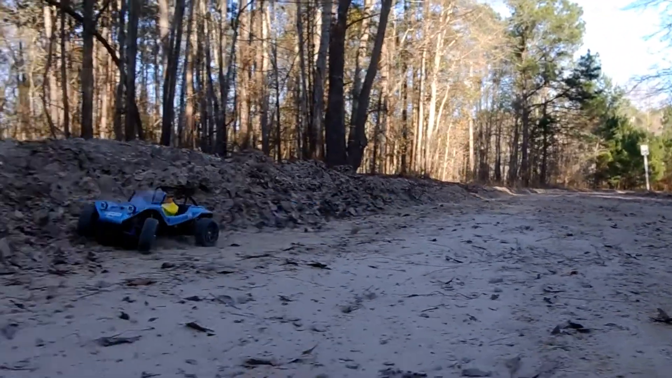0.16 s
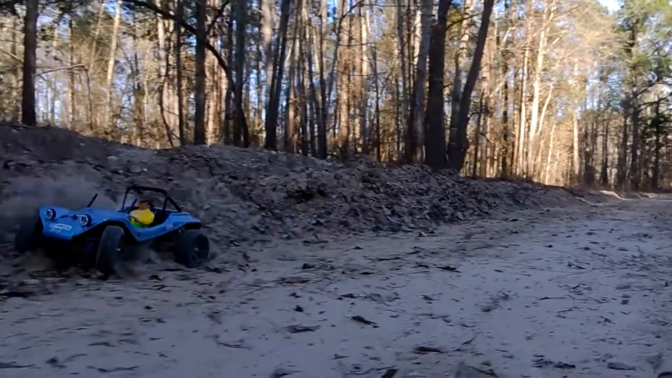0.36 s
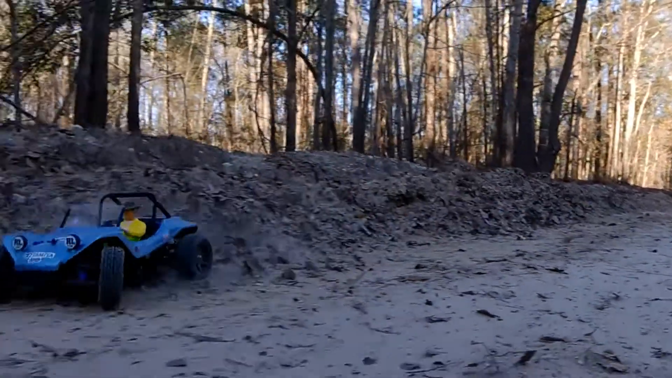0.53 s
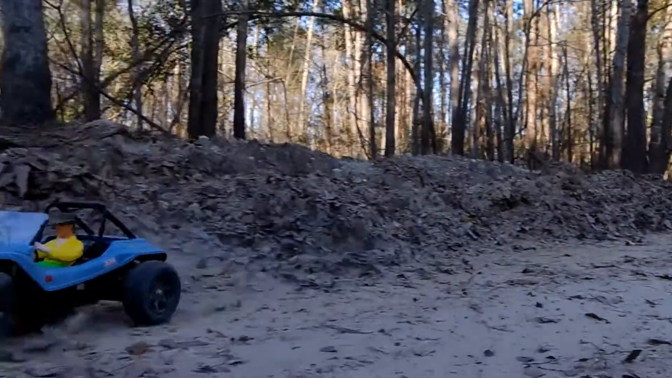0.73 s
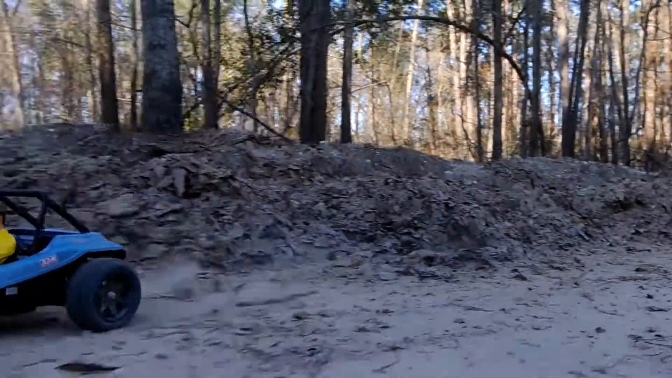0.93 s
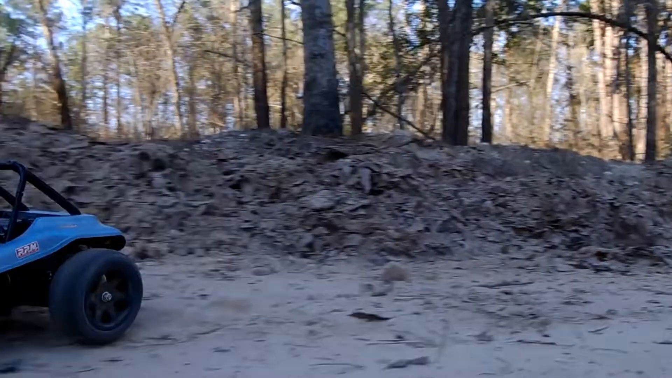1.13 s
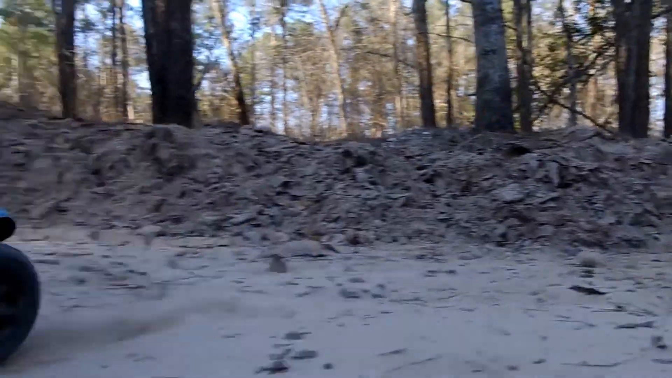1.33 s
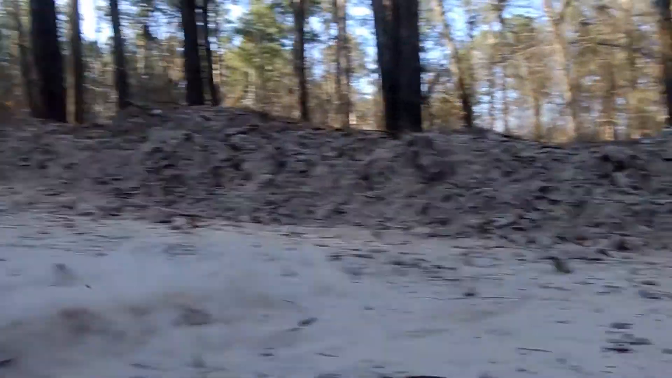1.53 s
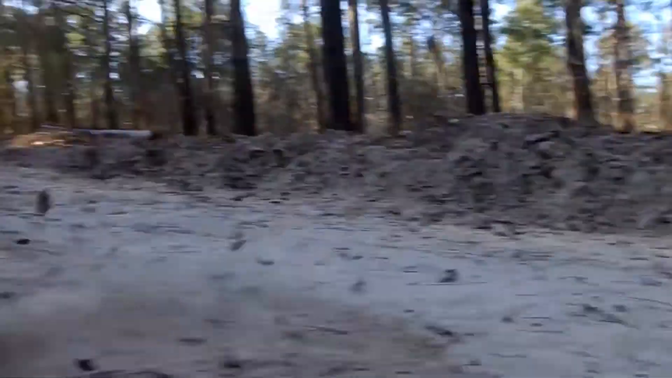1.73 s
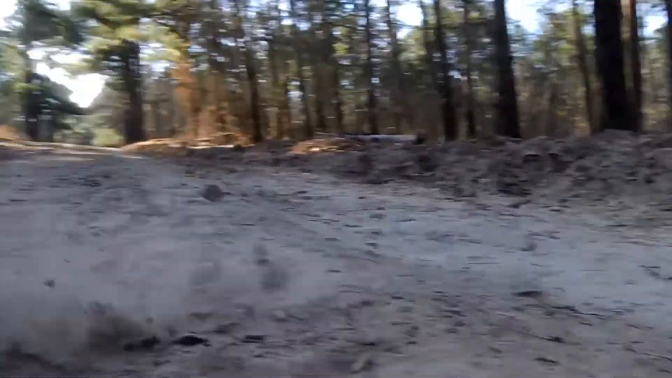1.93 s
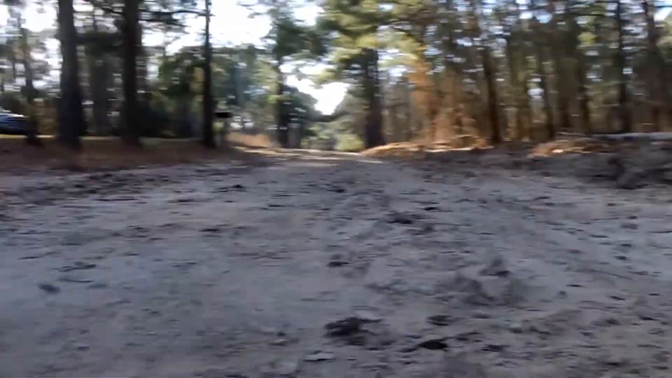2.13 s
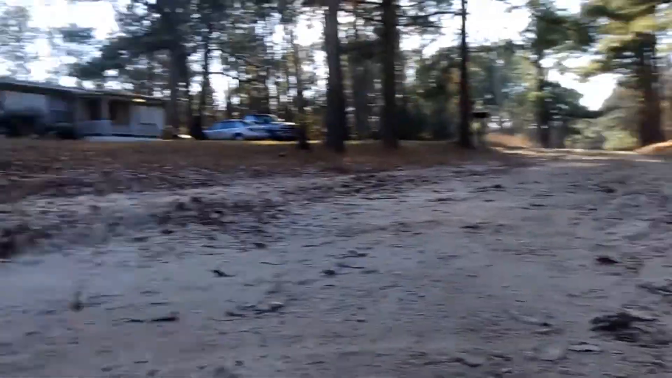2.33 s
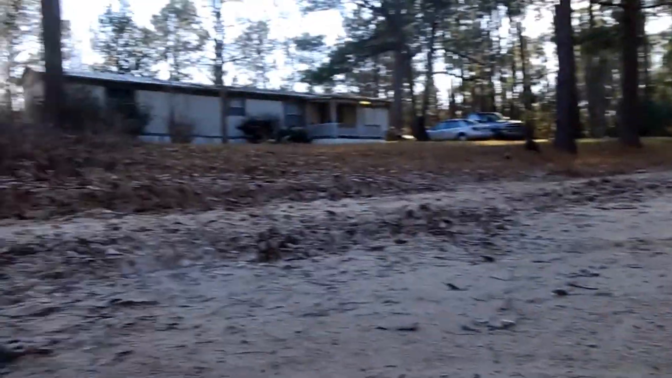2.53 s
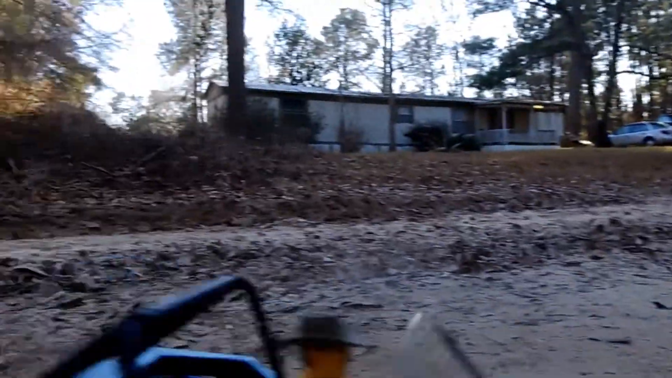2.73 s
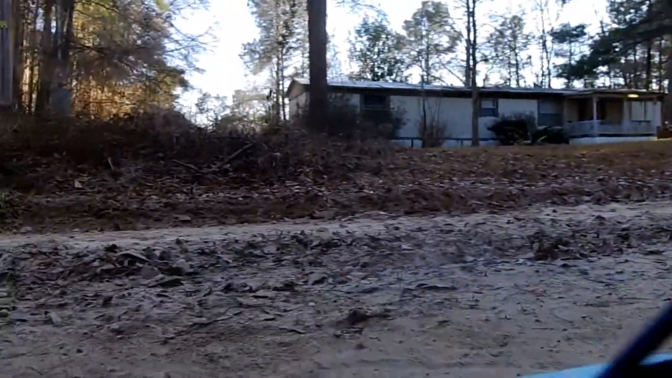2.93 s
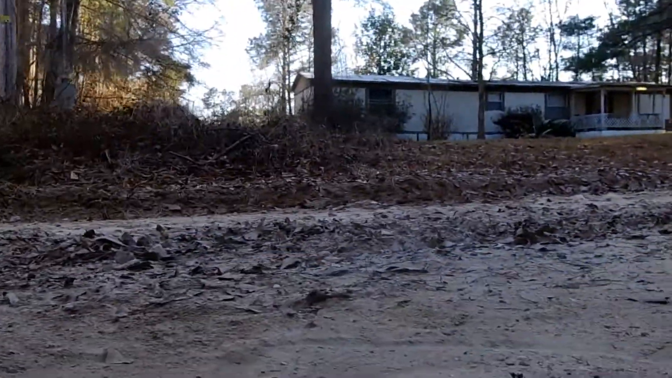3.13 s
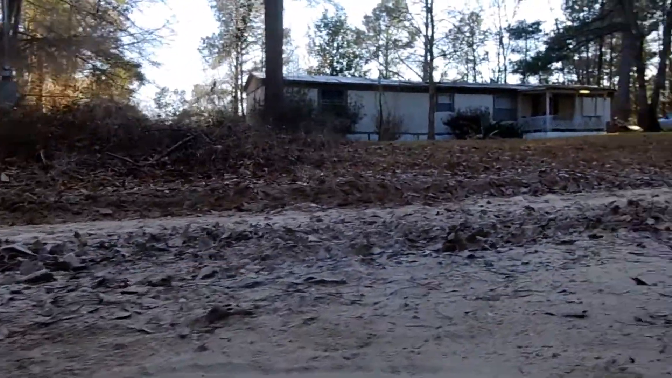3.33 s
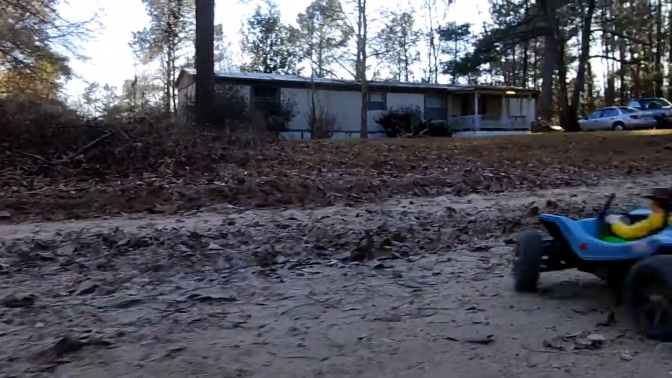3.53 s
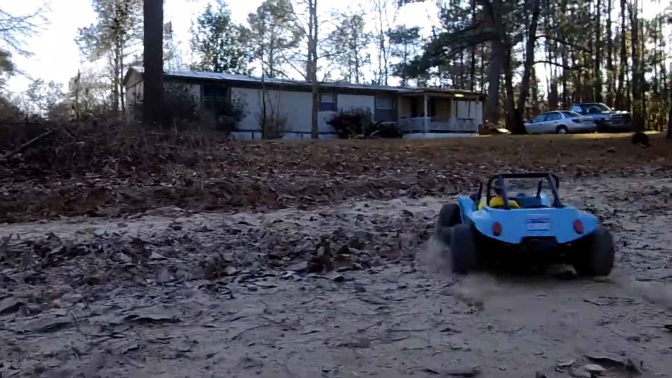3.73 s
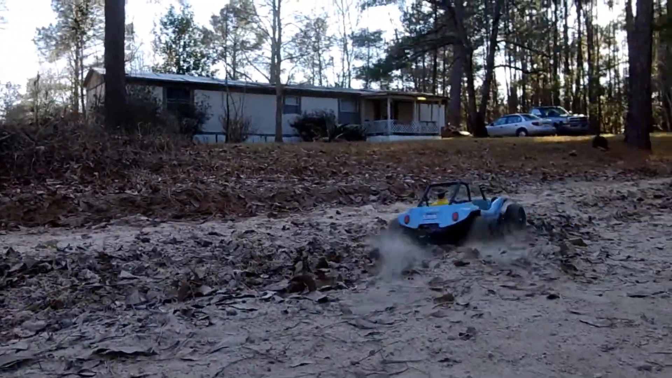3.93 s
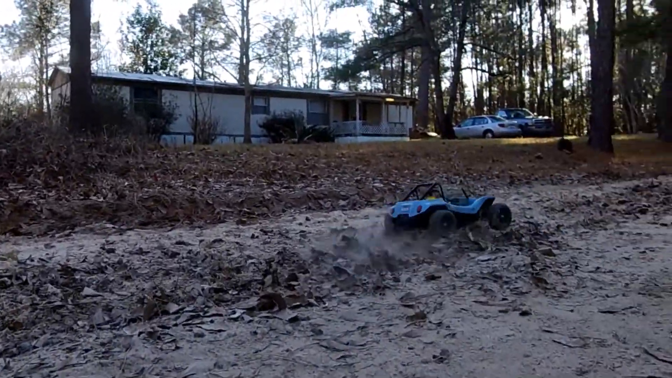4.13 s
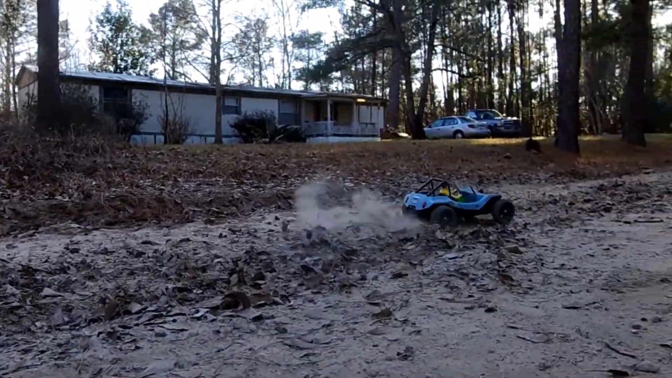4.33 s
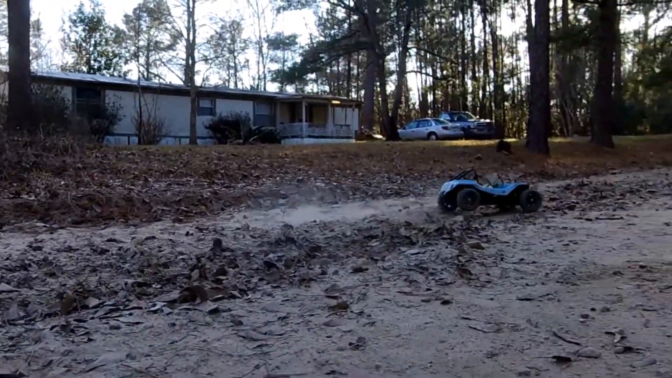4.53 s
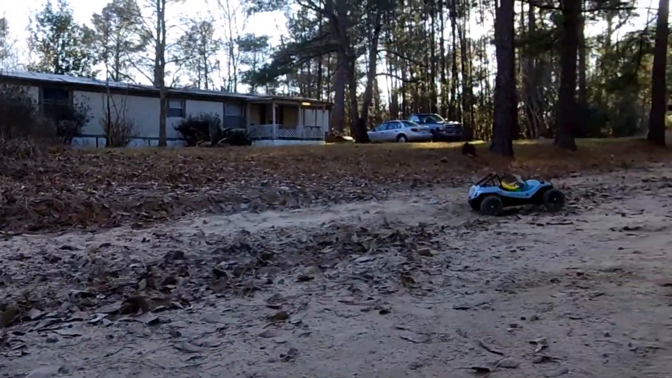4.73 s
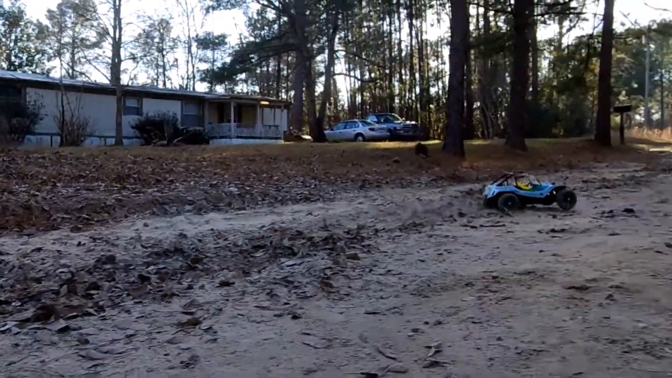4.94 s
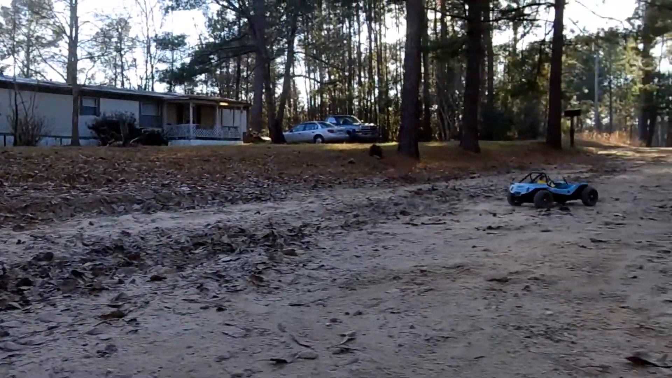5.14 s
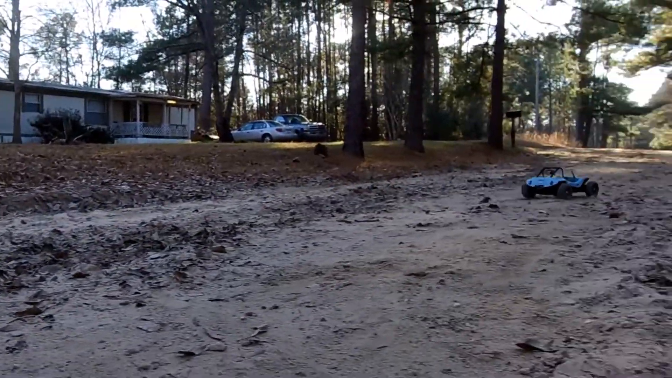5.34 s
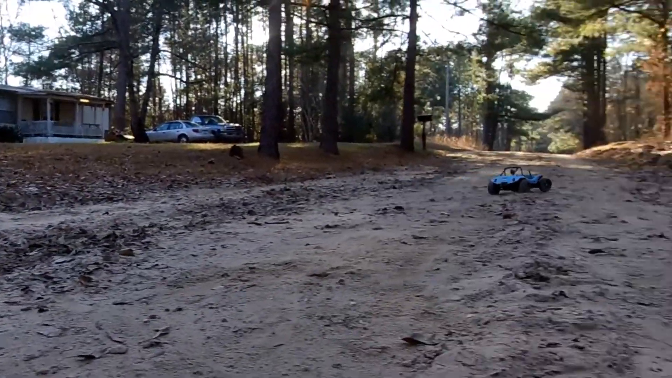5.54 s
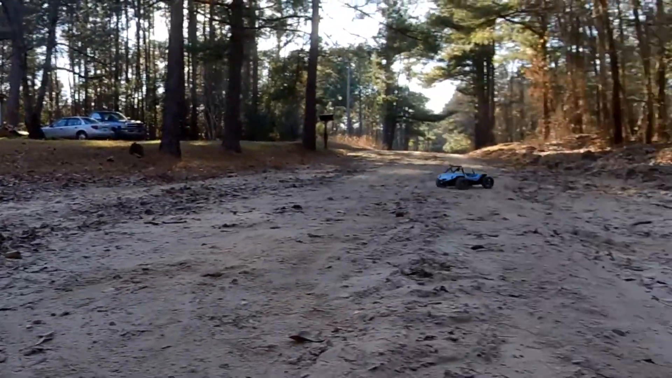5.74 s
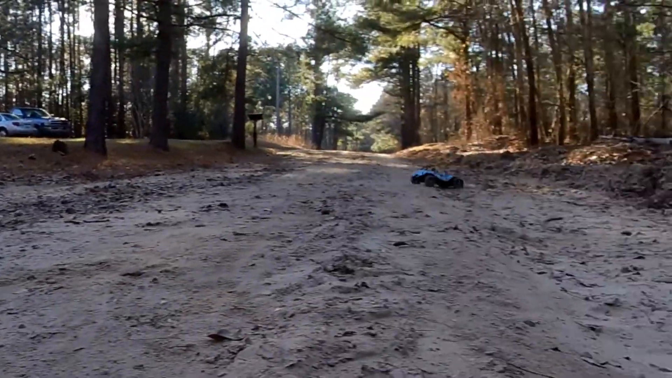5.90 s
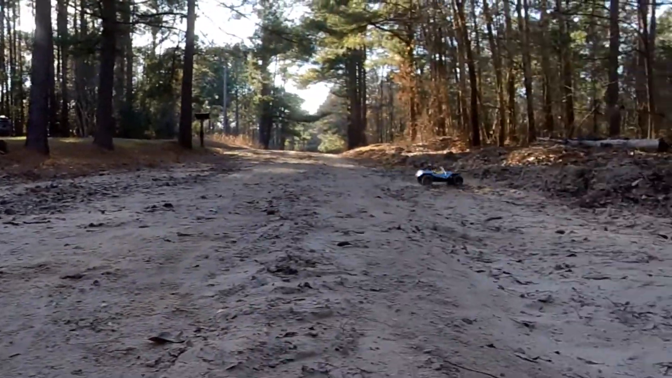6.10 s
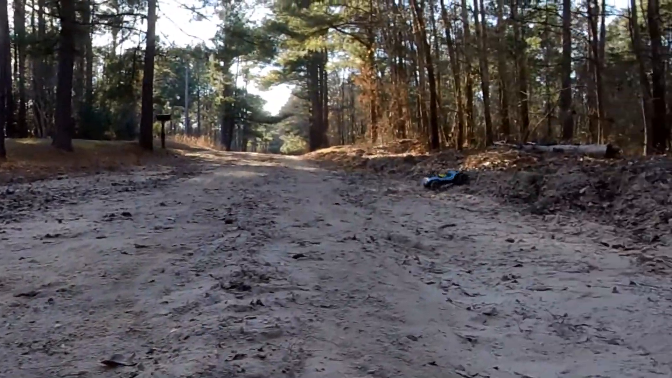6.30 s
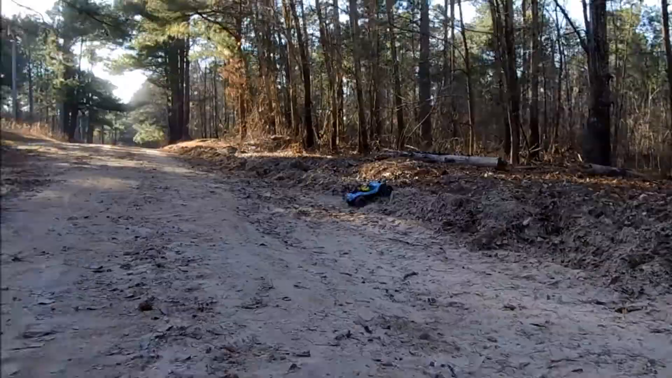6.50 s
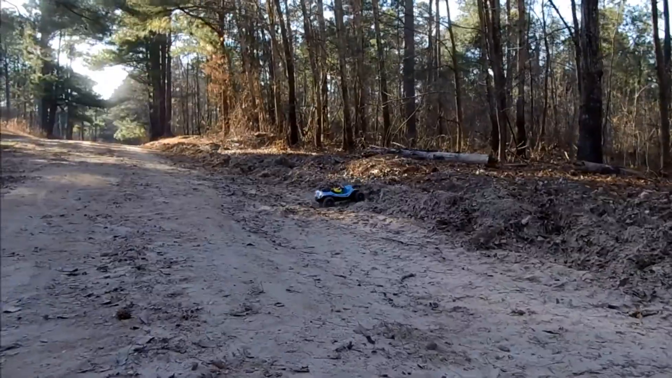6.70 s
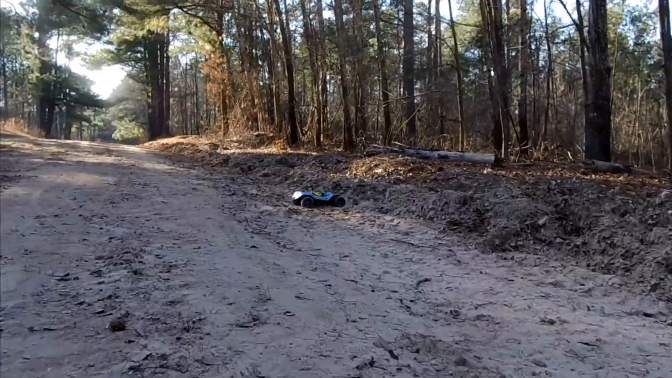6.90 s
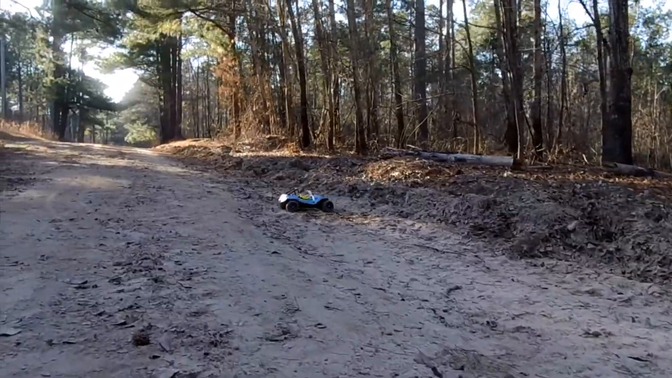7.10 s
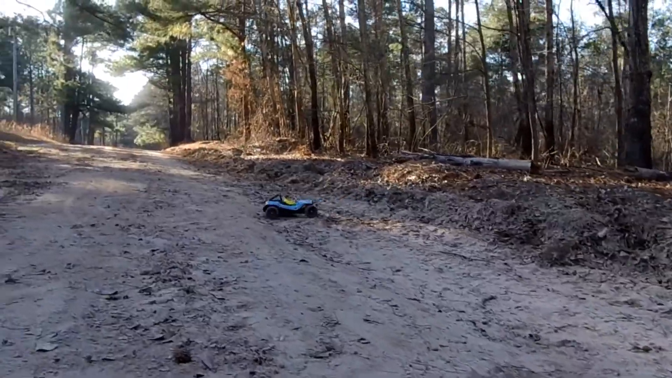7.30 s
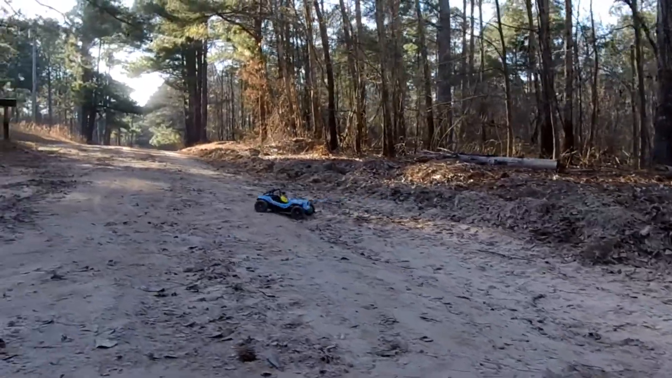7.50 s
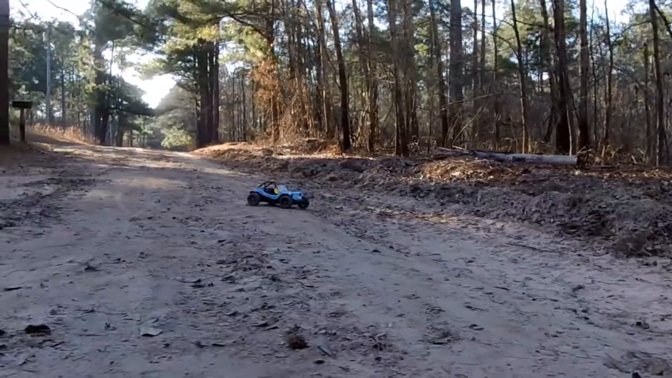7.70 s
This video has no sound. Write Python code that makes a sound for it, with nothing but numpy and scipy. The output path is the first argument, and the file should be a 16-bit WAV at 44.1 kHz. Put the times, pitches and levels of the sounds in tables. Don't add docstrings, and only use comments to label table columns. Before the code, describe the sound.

Outdoors on a dirt road by woods, a small remote-controlled buggy approaches with a wavering electric gear whine. Wind gusts thump and slap the phone microphone early on. The buggy passes very close around two seconds, its plastic body drumming with stone knocks, circles, then races and dips across ruts, spraying sand and leaves. It drives away, thinning to a faint whine and small clicks over a quiet hush.

```python
import sys
import numpy as np
from scipy import signal
from scipy.fft import rfft, irfft, next_fast_len
from scipy.io import wavfile
from scipy.ndimage import uniform_filter1d

SR = 44100
rng = np.random.default_rng(int(sys.argv[2]) if len(sys.argv) > 2 else 0)


def volts(x):
    e = np.asarray(x, float) / 20
    return 10 ** e


def inscribe(sig):
    pcm = np.round(np.clip(np.atleast_2d(sig).T, -1, 1) * 32767)
    wavfile.write(sys.argv[1], SR, pcm.astype(np.int16))


N = 342171
T = np.arange(N) / SR

# mode_hz, width_hz, level_db
TUB_MODES = [(413, 211, -2), (700, 340, -1), (1006, 620, -3), (1900, 1340, -12.5)]


def unit(x):
    return x / np.sqrt(np.mean(x ** 2))


def along(points, hz):
    f, db = np.transpose(points)
    return np.interp(np.log(hz), np.log(f), db)


def colour(x, points):
    size = next_fast_len(N)
    hz = np.arange(size // 2 + 1) * SR / size + 1
    return irfft(rfft(x, size) * volts(along(points, hz)), size)[:N]


def ring(x, modes):
    out = 0
    for k, (hz, wide, db) in enumerate(modes):
        b, a = signal.iirpeak(hz, hz / wide, SR)
        out = out + (-1) ** k * volts(db) * signal.lfilter(b, a, x)
    return out


def band(x, lo_hz, hi_hz):
    sos = signal.butter(4, (lo_hz, hi_hz), "bandpass", fs=SR, output="sos")
    return x / np.std(signal.sosfilt(sos, x))


def walk(rate):
    k = int(SR / rate)
    held = np.repeat(rng.standard_normal(N // k + 1), k)
    return unit(uniform_filter1d(uniform_filter1d(held, k), k)[:N])


def grains(rate, spread_db):
    hit = rng.random(N) < rate / SR
    sign, size = rng.standard_normal(N), rng.exponential(size=N)
    return unit(hit * sign * volts(spread_db * np.minimum(size, 4)))


def lulls():
    # from_s, to_s, effort_db
    lull_list = [(0, .07, -15), (.21, .345, -9), (.37, .41, -10), (.46, .5, -10), (.815, .848, -15),
                 (1.392, 1.409, -10), (1.426, 1.442, -12), (1.594, 1.604, -8), (1.655, 1.692, -14),
                 (3.018, 3.032, -12), (3.176, 3.194, -12), (3.595, 3.608, -10), (4.908, 4.924, -12),
                 (4.555, 4.59, -12), (4.606, 4.643, -15), (4.946, 4.958, -12), (5.03, 5.055, -8),
                 (5.645, 5.765, -6), (6.09, 6.8, -16), (6.8, 7.22, -11), (7.31, 7.37, -2), (7.57, 7.8, -20)]
    effort_db = sum(db * ((T > a) & (T < b)) for a, b, db in lull_list)
    return uniform_filter1d(effort_db, int(0.006 * SR))


def ruts():
    # centre_s, shake_db (tub and gears), extra_spray_db, width_ms
    rut_list = [(.025, 2, 11, 7.9), (.275, 2.5, 4.5, 17), (.3, -9, 6, 5.5), (.39, 4, 6, 17),
                (.825, 2.5, 0, 44), (0.461, 7, 2.5, 22), (.62, 7.5, -0.5, 20.4), (0.709, 0, -1, 3.9),
                (.95, -4, -5, 26), (1.21, 4.5, -19, 51), (1.27, -6, 11, 27.5), (1.63, 0.5, 7, 60),
                (1.711, 4.5, 3, 26.6), (3.0, 4.5, 7, 21), (3.07, 2.5, -17, 18), (3.111, 2.5, 9, 15.8),
                (3.312, 0.5, 8, 18.6), (4.581, -8, -4, 20.5), (4.651, 0.5, -4, 27.5),
                (4.73, -6.5, -3, 18.7), (5.0, 0.5, 0, 59), (5.251, 0.5, -11, 55), (5.97, 3, 4, 53),
                (6.091, -4, -6, 65), (6.27, 4.5, 2, 44), (6.36, -8, -10, 25), (6.411, 4, 11.5, 20),
                (6.649, -5.5, 11, 190), (7.301, 4, 9.5, 280), (7.511, 9.5, -12, 20), (7.641, -5, 2, 51),
                (7.76, 7.5, -2, 42)]
    out = np.zeros((2, N))
    for s, shake_db, spray_db, ms in rut_list:
        out += np.array([[shake_db], [spray_db]]) * np.exp(-.5 * ((T - s) / (ms / 1000)) ** 2)
    return out


def pairs(a, b):
    return np.stack([a, b], axis=1).ravel()


def drivetrain():
    # start_s, tooth_rate_before_hz, braking_ms,
    # tooth_rate_after_hz, grip_db
    approach = [(0.073, 2760, 18, 2520, -1), (0.12, 2600, 34, 2480, -6), (0.148, 2560, 21, 2400, 0),
                (0.186, 2650, 25, 2500, -2.5), (0.35, 2500, 11, 2230, -1), (0.43, 2300, 28, 2100, -0.5),
                (0.503, 2650, 14.2, 2500, -10), (0.533, 2780, 13, 2215, 8.5), (0.575, 2750, 15, 2460, 9),
                (0.611, 2600, 13.4, 2240, 8), (0.657, 2700, 15.3, 2398, 6), (0.686, 2400, 24, 1900, 10),
                (0.725, 1930, 7.6, 1878, 2), (0.755, 2180, 7.4, 2137, -14), (0.79, 2420, 20, 2200, 0.5)]
    on_bank = [(0.855, 2907, 82, 1827, 2.5), (0.962, 2130, 10, 1926, 0), (0.987, 2130, 13.7, 1876, 1),
               (1.02, 2040.0, 9.6, 1830.0, -5.5), (1.047, 1998, 20, 1822, -3), (1.09, 2186, 15, 2000, 0.5),
               (1.123, 2200, 16, 1900.0, 2), (1.193, 2360, 51.5, 1668, -4), (1.31, 2350, 30.7, 1850, 1.5),
               (1.377, 2233, 11.6, 2063, -4), (1.412, 2500.0, 8.3, 2220, 1.5), (1.442, 2500, 52.4, 1696, 0),
               (1.546, 2270, 5.9, 2250, -6), (1.558, 2242, 41, 1665, 1.5), (1.608, 2013, 4.2, 1993, -27),
               (1.652, 2370, 10.3, 2254, -4), (1.71, 2200, 24.2, 1850, 0.5), (1.746, 2202, 21, 2103, 1),
               (1.782, 2233, 34, 1804, 3), (1.879, 2162, 43, 1896, 1), (1.956, 2120, 13.2, 1816, -1),
               (2.041, 2170, 26, 1800, 5), (2.129, 2068, 64, 1728, 3), (2.25, 1935, 54, 1480, 2)]
    circling = [(2.351, 1620, 11.3, 1400, -7), (2.398, 1470, 3.5, 1460, -11), (2.435, 1710, 8.2, 1530, -14),
                (2.468, 1530, 4, 1520, -13), (2.49, 1750, 44, 1630, 1), (2.559, 1830, 50, 1510, 2.5),
                (2.681, 1810.0, 14.0, 1660, -2.5), (2.736, 1920.0, 34, 1670, -6.0),
                (2.806, 2030, 40, 1680, 1.5), (2.862, 1872, 4.4, 1847, 1), (2.892, 1920, 45, 1770, 0),
                (2.953, 1937, 37, 1650, -1), (3.014, 1795, 4, 1787, -5), (3.035, 2160.0, 13.1, 1656, 3),
                (3.063, 1780.0, 8.0, 1697, -6), (3.127, 2250, 21, 1660, 4.5), (3.165, 1703, 10.9, 1609, -6),
                (3.201, 2097, 8, 2020, 5), (3.223, 2105, 20.3, 1963, 6), (3.249, 1900, 12.2, 1510, 5.5),
                (3.292, 2160, 8.3, 2053, -4), (3.325, 2340.0, 19.7, 1614, 5), (3.39, 2070, 50, 1572, -0.5),
                (3.504, 2226, 18.4, 1986, 5), (3.545, 1996, 18.2, 1595, 3.5), (3.576, 1980, 14, 1800, 1),
                (3.611, 2200, 47, 1690, 1.5), (3.68, 1910.0, 7.5, 1690.0, 3),
                (3.702, 1850.0, 8.0, 1772, -1), (3.754, 2270.0, 32, 1670.0, 4.5),
                (3.88, 2410.0, 8.6, 2334, 13)]
    rutted = [(3.915, 2630, 32, 1948, 12), (3.947, 1945, 16, 1766, 6.5), (3.98, 2250, 31, 1944, 1),
              (4.022, 1940, 14.6, 1730, 11), (4.05, 1853, 12.4, 1760, 6), (4.112, 2400, 12, 2150, 12),
              (4.14, 2100, 25, 1680, 13), (4.192, 2127, 16, 1776, 10), (4.262, 2280, 9.3, 2196, 8),
              (4.288, 2380, 34, 2194, 7), (4.325, 2047, 18, 1913, 5), (4.345, 2030, 19.5, 1600, 10.5),
              (4.39, 1770, 7.1, 1725, 7), (4.413, 2084, 19, 1900, 0), (4.448, 2100, 21, 1812, 5),
              (4.48, 1824, 13.7, 1538, 7), (4.522, 1876, 8.2, 1804, 6), (4.538, 2130, 19, 1820, 10.5),
              (4.594, 2810, 10, 2500, 8.5), (4.645, 1866, 14.5, 1465, 12), (4.682, 1482, 18, 1391, 1),
              (4.732, 1680, 4.4, 1640, 15.5), (4.744, 2257, 19.3, 2190, -2), (4.772, 2430, 28, 2050, 5.5),
              (4.823, 2823, 20, 2010, 6)]
    leaving = [(4.86, 2166, 12.0, 1956, 8), (4.889, 2032, 9.7, 1756, 9), (4.978, 2300, 34, 1702, 6.5),
               (5.051, 1925, 11.6, 1862, -4), (5.082, 1954, 20.0, 1784, 1), (5.14, 1983, 6.6, 1878, 9),
               (5.163, 2070, 7.3, 1870, 5), (5.192, 1990, 11, 1850, 4), (5.223, 1966, 8.6, 1803, 8),
               (5.256, 1943, 9.8, 1880, 11.5), (5.286, 2084, 12.0, 1900.0, 9),
               (5.309, 1960, 8.37, 1900, -6), (5.352, 2190, 18.4, 1865, 4), (5.437, 2535, 17, 1940, 9),
               (5.49, 2020, 17, 2000, 2), (5.534, 2125, 18, 1960, -5), (5.622, 2620, 18.3, 2080, 7),
               (5.773, 2610, 33, 2060, 9), (5.872, 2488, 22, 2230, 6), (5.913, 2520, 22, 2253, 4),
               (5.955, 2560, 21, 2400, 10), (6.004, 2600, 11.6, 2500, 4), (6.034, 2600, 10.5, 2260, 0),
               (4.927, 1994, 17, 2010, 5), (4.96, 2320, 11.4, 2300, 1), (5.064, 2394, 15.3, 1928, 10),
             (6.831, 2100, 42, 1847, 2), (6.93, 1900, 13, 1822, 11), (6.998, 1900, 11.3, 1827, 13),
             (7.045, 2013, 20.3, 1850, 9), (7.15, 1900, 49, 1600, 8), (7.233, 2007, 20.5, 1914, -3),
             (7.28, 2000, 19.5, 1860, 4), (7.356, 2770, 11.6, 2000, -1), (7.409, 2040, 8.9, 1980, 2),
             (7.47, 2150, 23, 2010, -1), (7.51, 2234, 31, 2030, -4)]
    # from_s, level_db, float_loss_db, run_up_lag (a power)
    racing = [
        (0, -8, 10, 1.3),
        (.7, -3, 8, 1.1),
        (1.5, 1, 2, .85),
        (3.0, 0, 10, 1.4),
        (3.9, 0, 5, 1.1),
        (4.85, -1, 8, 1.4),
        (5.8, -5, 8, 1.1),
    ]
    slack_db_per_octave = -5.5
    s, fast, ms, slow, grip_db = np.transpose(sorted(approach + on_bank + circling + rutted + leaving))
    since, *rules = np.transpose(racing)
    racing_db, float_db, lag = np.array(rules)[:, np.searchsorted(since, s) - 1]

    turns = np.maximum.accumulate(pairs(s, s + ms / 1000))
    turn_hz = pairs(fast, slow)
    run_up_octaves = np.log2(np.roll(fast, -1) / slow)
    free_db = racing_db + 0.09 * grip_db + slack_db_per_octave * run_up_octaves
    turn_db = pairs(grip_db, free_db)

    place = np.interp(T, turns, np.arange(len(turns)))
    stage = place.astype(int)
    slowing, gone = stage % 2 == 0, place - stage
    braking = 1 - (1 - gone) ** 1.3
    run_up = gone ** lag[stage // 2] * (1.5 - .5 * gone)
    bent = np.where(slowing, braking, run_up)
    hz = uniform_filter1d(np.interp(stage + bent, np.arange(len(turns)), turn_hz), int(.004 * SR))
    floating_db = -float_db[stage // 2] * np.where(slowing, 0, gone ** 2 - .3)
    load_db = uniform_filter1d(turn_db[stage] + floating_db, int(0.005 * SR))
    jolt = np.tanh(np.maximum(-np.gradient(np.log(hz)) * SR, 0) / 16)
    return hz, load_db, jolt


def whine(hz, load_db, first_db):
    # mode_hz, level_db
    case = [(1300, -22), (1750, -4.5), (2200, -4), (2600, -12.5), (3200, -28.5), (4000, -8.5), (4600, -4.5),
            (5250, -1), (5750, -2.5), (6300, -12), (6900, -19), (8000, -21.5), (9300, -30.5),
            (10600, -24.5), (13500, -42)]
    pinion_teeth, whine_db = 20, -4
    shudder = np.where(T < 3.0, .006, .011)
    hz = hz * (1 + shudder * walk(55) + .007 * walk(90) + .012 * walk(300))
    phase = 2 * np.pi * np.cumsum(hz) / SR
    contact_db = 1.8 * walk(70)
    out = 0
    for k in range(1, 7):
        runout = 1 + .3 * np.cos(phase / pinion_teeth + 2 * np.pi * rng.random())
        flicker_db = 2.3 * walk(170) + 1.2 * walk(40) + (2 + .6 * k) * walk(500)
        low_order_db = first_db * max(1 - 0.66 * (k - 1), 0)
        db = along(case, k * hz) + contact_db + flicker_db + low_order_db
        out = out + volts(db) * runout * np.sin(k * phase) * (k * hz < .4 * SR)
    return out * volts(load_db + whine_db)


def bank(x):
    # delay_ms, level_db
    echoes = [
        (3.1, -13),
        (9.7, -15),
    ]
    return x + sum(volts(db) * np.roll(x, int(ms * SR / 1000)) for ms, db in echoes)


def chassis(hz):
    shaft_ratio = 26
    turn = 1 + 0.097 * np.cos(2 * np.pi * np.cumsum(hz) / SR / shaft_ratio)
    hits = grains(1500, 1.9) * turn * volts(3.2 * walk(16))
    hits = hits + 0.5 * rng.standard_normal(N)
    return band(ring(ring(hits, TUB_MODES), [(645, 17000, 0)]), 207, 3100)


def lumps():
    thumps = grains(260, 3.5) * volts(4 * walk(11))
    return unit(ring(ring(thumps, [(412, 140, 0)]), [(452, 280, 0)]))


def grind():
    # mode_hz, width_hz, level_db
    grit_modes = [(2100, 560, 12), (3160, 3010, 8), (4130, 1050, 11.5), (5560, 1100, 2), (8530, 3380, -18),
                  (10200, 1100, -15.5)]
    grit = grains(9000, 2.8) * volts(1.45 * walk(24.55))
    return band(ring(grit, grit_modes), 2744, 3760)


def spray():
    # freq_hz, level_db (per Hz)
    spray_tone = [(600, -19), (2000, -9), (5000, 0), (8000, 0), (11000, -1), (15500, -9)]
    sand = grains(16000, 1.6)
    handfuls = sand * volts(2.2 * walk(22))
    return band(colour(handfuls, spray_tone), 7300, 14600)


def gusts():
    # start_s, peak_db, hold_s
    gust_list = [(0, -46, 0.089), (0.19, -33, .005), (0.368, -41, 0.0052), (0.647, -28.5, 0.0034),
                 (0.702, -31.5, 0.14), (0.833, -28.5, 0.027), (0.93, -30, 0.09), (1.007, -29, 0.16),
                 (1.195, -21.5, 0.041), (1.243, -27.5, 0.072), (1.372, -19, 0.0063), (1.4, -27.5, 0.12),
                 (1.606, -36.5, 0.035), (1.739, -48, 0.2), (2.165, -42, 0.026), (2.222, -49.5, 0.13),
                 (2.83, -40, 0.027), (2.918, -48, 0.68), (3.329, -40, 0.0099), (3.768, -44, 0.011),
                 (5.918, -47, 0.049), (6.67, -51, 0.02), (6.814, -50, 0.038), (7.033, -43, 0.028),
                 (7.206, -55, 0.086), (7.527, -45, 0.031)]
    breeze_db, rise_db_s, fall_db_s = -53.5, 305, 215
    swells = []
    for s, db, hold in gust_list:
        away_db = rise_db_s * np.maximum(s - T, 0) + fall_db_s * np.maximum(T - s - hold, 0)
        swells.append(volts(db - away_db))
    return volts(breeze_db) + np.max(swells, axis=0)


def wind():
    # freq_hz, level_db (per Hz)
    buffet = [(15, -11.5), (28, -4.5), (42, -1.5), (70, -6.5), (130, -16), (250, -26), (600, -76)]
    # centre_s, peak_db, width_ms (negative = suction)
    slap_list = [(0.651, -13.5, -5), (0.713, -25, 3), (0.912, -20, 4), (0.939, -19, 11), (1.237, -23, 10),
                 (0.85, -19, 4), (0.871, -30, 2), (1.203, -18.5, 2), (1.3669, -10, 1.5), (1.384, -22, 8),
                 (1.403, -7.5, 2), (1.466, -19.5, 2), (1.526, -16, 2), (1.554, -17, 1)]
    rumble = colour(rng.standard_normal(N), buffet) * volts(2.2 * walk(13))
    rumble = band(rumble, 24, 160)
    slaps = 0
    for s, db, ms in slap_list:
        slaps = slaps + np.sign(ms) * volts(db) * np.exp(-.5 * ((T - s) / (ms / 2000)) ** 2)
    slaps = signal.sosfilt(signal.butter(1, 14, "highpass", fs=SR, output="sos"), slaps)
    return rumble * gusts() * volts(-4.0) + slaps


def woods():
    # freq_hz, level_db (per Hz)
    hush_tone = [(71, -58), (120, 13), (288, -1), (469, -33), (733, -4), (1220, -3), (1990, -9.5),
                 (15500, -19.5)]
    return unit(colour(rng.standard_normal(N), hush_tone)) * volts(-63)


def trees(buggy, near_db):
    tail = np.arange(int(.3 * SR)) / SR
    scatter = unit(rng.standard_normal(len(tail)) * np.exp(-tail / .05) * (tail > .012))
    back = signal.fftconvolve(buggy * volts(-.15 * (near_db + 44)), scatter)[:N]
    return volts(-57.0) * ring(back, [(2500, 5000, 0)])


def ticks():
    # start_s, peak_db (high part), low_part_db
    tick_list = [(0.287, -45.5, 9), (0.2957, -49, 0), (0.7035, -41.5, 5.5), (0.769, -34.5, -3),
                 (3.112, -29, -20), (3.61, -44.5, 5.5), (4.149, -54, -24), (4.5393, -50.5, 3.5),
                 (4.5938, -42, -20), (4.6469, -48.5, 1.5), (4.8291, -41, -18), (4.9901, -48, 3.5),
                 (5.17, -54, -4), (5.2572, -59, -15), (5.44, -53, 2.5), (5.623, -46, -15), (5.8311, -49, 0),
                 (5.843, -54, 2), (5.863, -65, 5), (5.9825, -53.5, 2.5), (6.028, -56.5, 5.5),
                 (6.038, -59, 0), (6.123, -49, -29), (6.206, -63.5, 6.5), (6.255, -58, -10),
                 (6.2854, -50.5, -10), (6.3006, -66, -10), (6.4383, -50, -24), (6.6601, -35.5, -38),
                 (6.802, -55.5, -0.5), (7.014, -56.5, 2), (7.4647, -51, -2)]
    high, low, tail = np.zeros(N), np.zeros(N), np.arange(2048) / SR
    snap = np.exp(-tail / .005) * np.minimum(tail / .0013, 1)
    thump = np.exp(-tail / 0.013)
    cracks = rng.standard_normal((len(tick_list), len(tail)))
    for (s, db, low_db), crack in zip(tick_list, cracks):
        i = int(s * SR)
        high[i:i + len(tail)] += volts(db - 6) * crack * snap
        low[i:i + len(tail)] += volts(db + low_db + 13.0) * crack * thump
    high = ring(ring(high, [(5140, 20500, 1.0)]), [(4700, 10600, 1.0)])
    return high + ring(low, [(1520, 1730, -3.0), (480, 34, 8.5)])


def panel():
    # start_s, level_db, pitch_hz
    panel_hits = [(0.709, -26.5, 1120), (4.331, -46, 1195), (4.651, -51, 1285), (4.685, -41, 1376),
                  (5.625, -43.5, 1247), (5.833, -48, 1213), (5.862, -50, 516), (6.027, -48, 681),
                  (6.205, -49, 895), (5.951, -50, 1217), (5.98, -47, 1196), (6.045, -50, 1487),
                  (7.489, -47, 773), (7.502, -43, 610), (7.513, -48, 905), (7.527, -44, 640)]
    decay_s = 0.0081
    rattle = volts(2.5 * walk(250))
    out = 0
    for s, db, hz in panel_hits:
        after = np.maximum(T - s, 0)
        out = out + volts(db) * np.exp(-after / decay_s) * np.sin(2 * np.pi * hz * after)
    return rattle * out


def knocks():
    # start_s, peak_db
    strikes = [(1.643, -45), (1.678, -20), (1.743, -45), (1.803, -24), (1.905, -20), (1.93, -28),
               (2.018, -29), (2.059, -17.5), (2.12, -15), (2.165, -20), (2.196, -25), (2.247, -20),
               (2.323, -18.5), (2.351, -18), (2.487, -21.5), (2.521, -19), (2.677, -26), (2.781, -27),
               (2.878, -19.5), (3.06, -16.5), (3.161, -22), (3.389, -30)]
    out, tail = np.zeros(N), np.arange(1024) / SR
    rattles = rng.standard_normal((len(strikes), len(tail)))
    for (s, db), rattle in zip(strikes, rattles):
        i = int(s * SR)
        out[i:i + len(tail)] += volts(db + 7.5) * rattle * np.exp(-tail / 0.013)
    return ring(ring(out, TUB_MODES), [(640, 2400, 0)])


def scene():
    # time_s, nearness_db, motor_effort_db, loose_ground_db,
    # first_db (low tooth orders against the high ones)
    drive = [(0, -43, -4.5, -8.5, -10), (0.348, -43, 2, 1.5, 4), (.6, -41.5, -0.5, -2.5, 0),
             (1.0, -40, 5.5, -8.5, 1), (1.25, -38.5, 9.5, -9, 1), (1.351, -39.5, 12, -4.5, 1),
             (1.747, -35, 8, -7.5, -1), (2.3, -32, 0, -13, 3.5), (2.499, -36.5, 2, -27, 2),
             (2.85, -33.5, 8.5, -14, -5.5), (3.3, -40, 5, -6, -0.5), (3.701, -44.5, 6, 0.5, 4),
             (4.0, -47, 0.5, -1, -11), (4.52, -50.5, -2, -3, -14), (4.648, -49, -5, -4.5, 4),
             (5.55, -55, 2.5, -5.5, -5), (6.1, -58, -8.5, -6, 7.5), (7.76, -64, -6, -15.5, 24.5)]
    s, *columns = np.transpose(drive)
    near_db, effort_db, loose_db, first_db = (np.interp(T, s, c) for c in columns)
    effort_db = effort_db + lulls()
    shake_db, thrown_db = ruts()
    hz, load_db, jolt = drivetrain()
    thrown_db = thrown_db + 1.5 * jolt
    buggy = bank(whine(hz, load_db + effort_db + 0.033 * shake_db, first_db))
    buggy = buggy + volts(shake_db - 2.5 + 4.3 * jolt) * chassis(hz)
    buggy = buggy + volts(-8.5 + 0.75 * shake_db - 8.5 * (T < 1.6)) * lumps()
    buggy = buggy + volts(-17 + 0.32 * effort_db + 1.23 * shake_db + 2.7 * jolt) * grind()
    buggy = buggy + volts(loose_db + thrown_db - 9.5) * spray()
    buggy = volts(near_db) * buggy + ticks() + panel()
    return (buggy + trees(buggy, near_db) + woods() + wind() + knocks())[None]


def low_pass(x):
    return signal.sosfilt(signal.butter(12, 15710, fs=SR, output="sos"), x)


def record(dry):
    cut = signal.sosfilt(signal.ellip(10, .2, 80, 15660, fs=SR, output="sos"), dry)
    return low_pass(cut)


dry = scene()
out = record(dry)
inscribe(out)
```